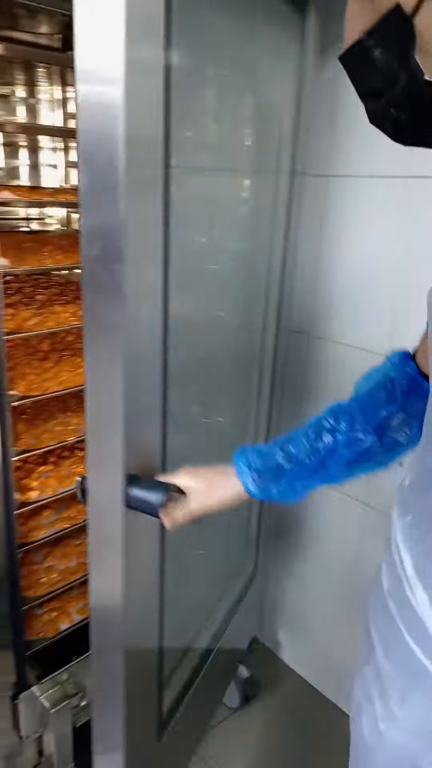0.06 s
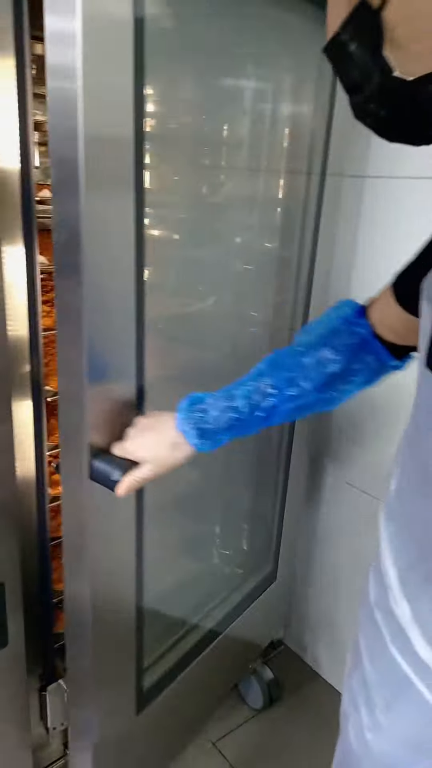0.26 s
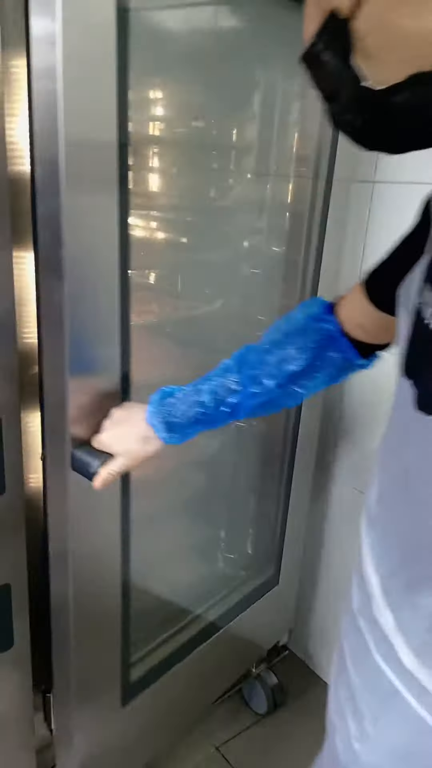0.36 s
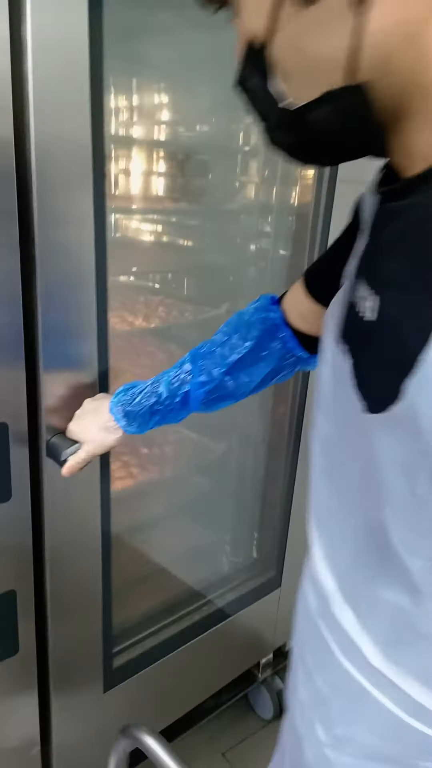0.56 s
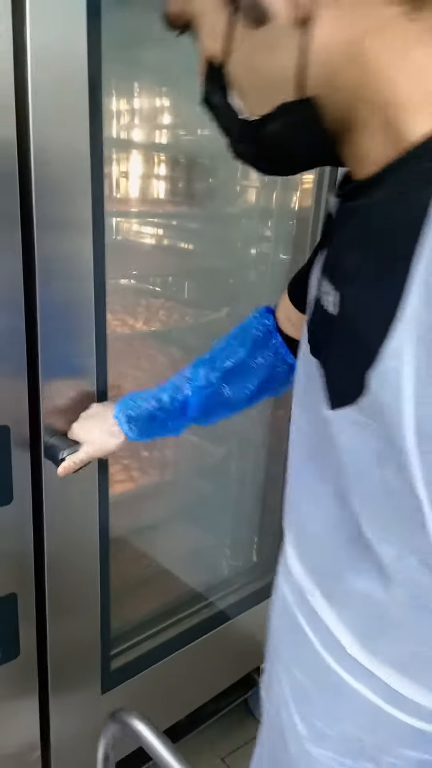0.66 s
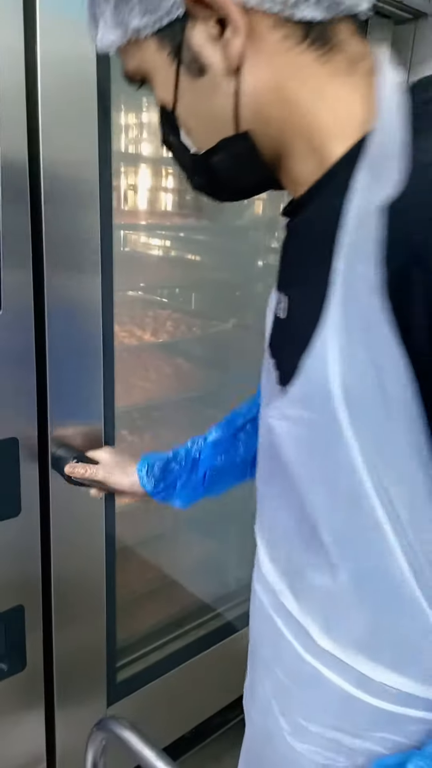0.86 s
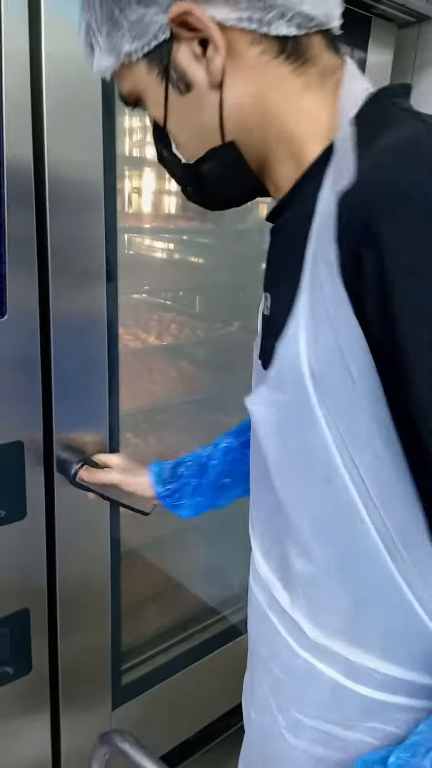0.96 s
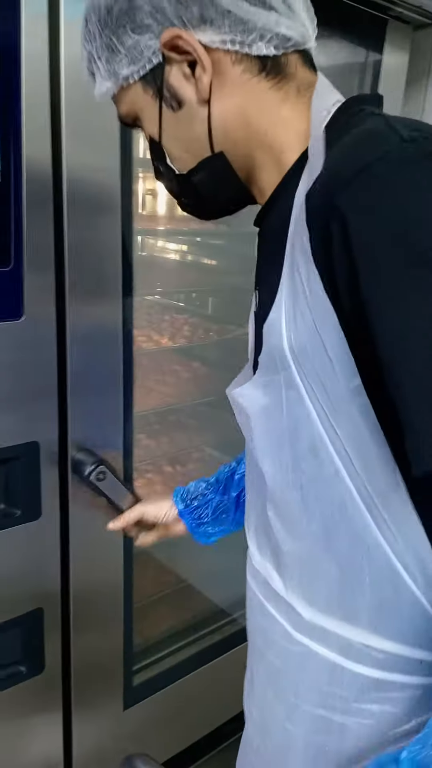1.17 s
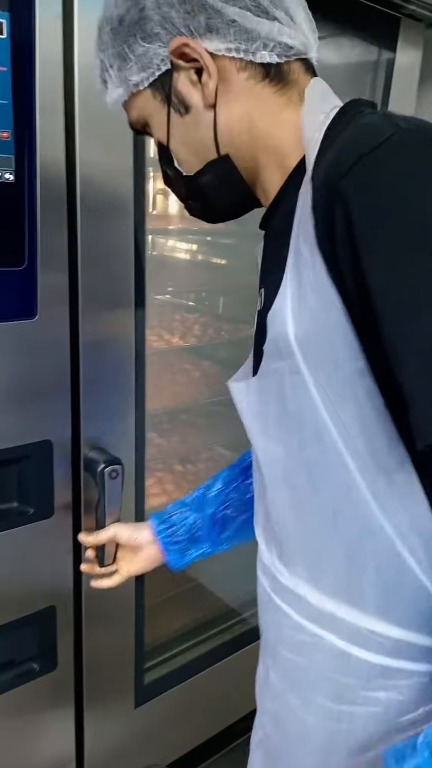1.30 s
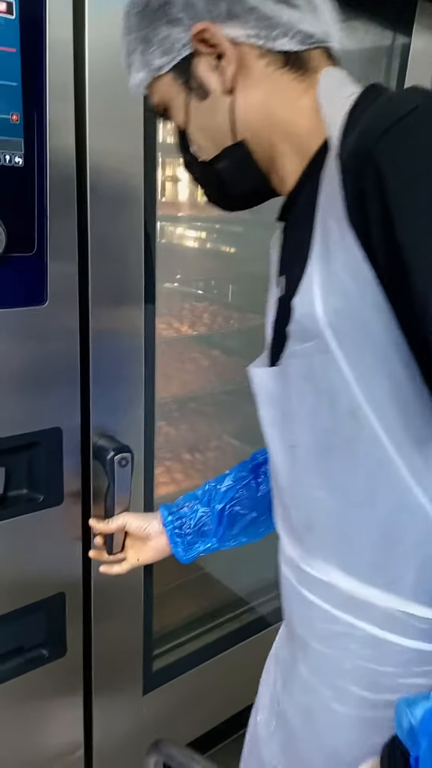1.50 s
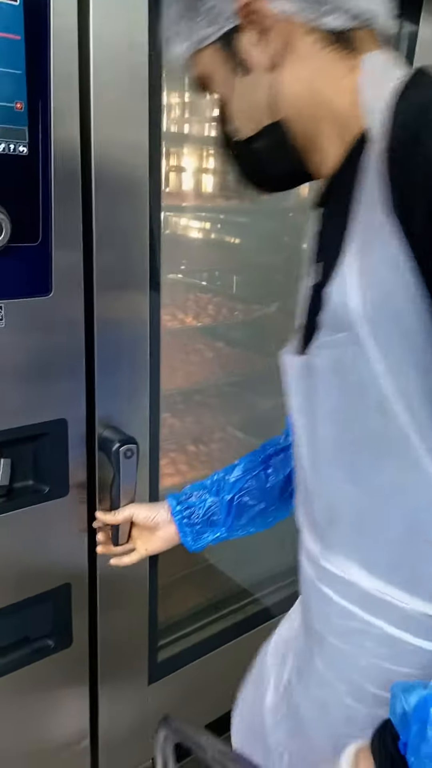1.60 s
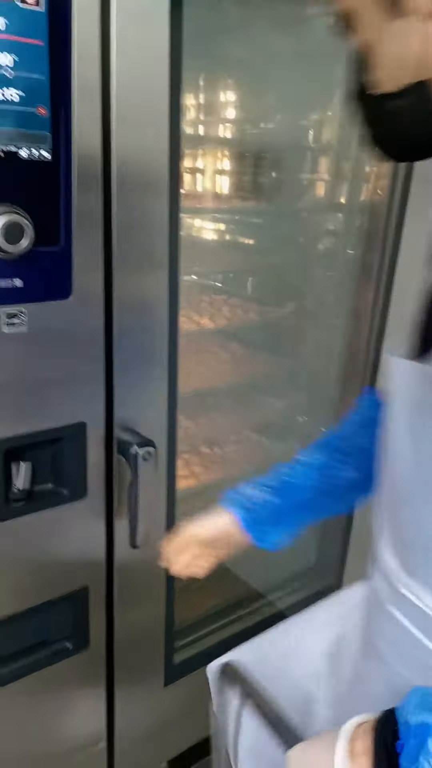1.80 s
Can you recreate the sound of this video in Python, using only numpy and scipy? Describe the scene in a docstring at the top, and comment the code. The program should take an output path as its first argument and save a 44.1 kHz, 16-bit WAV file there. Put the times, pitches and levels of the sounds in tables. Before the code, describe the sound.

A heavy steel oven door swings shut: a loose part clangs and rings, the latch scrapes, the rubber seal squeaks and the door thuds home. Then the handle snaps into place. Close stereo sound in a tiled kitchen with humming ventilation.

```python
"""A tiled kitchen, a stereo pair of microphones at the oven, the ventilation humming steadily behind.
The heavy steel door is swung shut: a loose steel part clangs and rings, the latch scrapes in,
the rubber seal squeaks and the door thuds home. Then the handle is turned down: it snaps into place
and the door clunks tight. The tiles add a short bright tail to latch and seal."""
import sys
import numpy as np
from scipy import signal
from scipy.fft import rfft, irfft
from scipy.io import wavfile

SR = 44100
rng = np.random.default_rng(int(sys.argv[2]) if len(sys.argv) > 2 else 0)


def dump(signal):
    """Clip the signal to [-1, 1] and save it as 16-bit WAV at the path in sys.argv[1]."""
    limited = np.clip(np.atleast_2d(signal).T, -1, 1)
    pcm = np.round(limited * 32767).astype(np.int16)
    wavfile.write(sys.argv[1], SR, pcm)


N = 81585
T = np.arange(N) / SR
FREQS = np.maximum(np.fft.rfftfreq(N, 1 / SR), 1)
ALIKE_BELOW_HZ = 780  # below this both microphones hear nearly the same


def undb(db):
    """Decibels to amplitude."""
    return 10 ** (np.asarray(db) / 20)


def unit(x):
    """Scale to rms 1."""
    return x / np.sqrt(np.mean(x ** 2))


def curve(points):
    """Gain at every frequency from (f/Hz, level/dB) points."""
    hz, db = np.array(points).T
    return undb(np.interp(np.log(FREQS), np.log(hz), db))


def below(hz):
    """Gain of a fourth-order low-pass."""
    return 1 / np.sqrt(1 + (FREQS / hz) ** 8)


def between(low_hz, high_hz):
    """Gain of a band-pass with a steep lower edge."""
    return below(high_hz) * (1 - below(low_hz) ** 2)


def crowded_modes(spacing_hz, peak_db):
    """Gain of a metal body with many close resonances: random peaks and valleys."""
    grid = np.arange(0, SR / 2, spacing_hz)
    heights = np.clip(rng.standard_normal(len(grid)), -2, 1.5)
    return undb(peak_db * np.interp(FREQS, grid, heights))


def fade(start, t60):
    """Envelope: full until start, then down 60 dB every t60 seconds."""
    return np.exp(-np.log(1000) * np.maximum(T - start, 0) / t60)


def strike(start, rise, t60):
    """Envelope: a quick rise, then an even fade."""
    return (1 - np.exp(-np.maximum(T - start, 0) / rise)) * fade(start, t60)


def swell(middle_s, spread_s):
    """Envelope: a smooth bell curve."""
    return np.exp(-.5 * ((T - middle_s) / spread_s) ** 2)


def noise(gain):
    """Stereo noise of a given colour at rms 1; the bass is alike at both microphones."""
    mid, side = rfft(rng.standard_normal((2, N)))
    alike = .95 / (1 + (FREQS / ALIKE_BELOW_HZ) ** 2)
    mid, side = mid * np.sqrt(1 + alike), side * np.sqrt(1 - alike)
    return unit(irfft(np.array([mid + side, mid - side]) * gain, N))


def ring(hz, start):
    """A sine at both microphones; their phases draw together in the bass."""
    apart = rng.choice([-1, 1]) * rng.uniform(.7, 1.3) * np.pi / 4 * min(hz / ALIKE_BELOW_HZ, 1)
    return np.sin(2 * np.pi * hz * (T - start) + np.array([[apart], [-apart]]))


def kitchen(x, wet_db):
    """Direct sound plus the short bright tail off the tiles."""
    tail = unit(noise(1) * strike(0, rise=.001, t60=.31)) / np.sqrt(N)
    return x + undb(wet_db) * signal.fftconvolve(np.broadcast_to(x, (2, N)), tail, axes=1)[:, :N]


# spectrum of the rushing air (f/Hz, relative level/dB)
AIR_COLOUR = [(15, -68), (25, -31.5), (92, -8.5), (134, -3.5), (263, -6), (293, -1), (354, -15),
              (489, -15.5), (531, -16), (695, -16.5), (962, -19.5), (1400, -21.5), (2160, -27.5),
              (3520, -30.5), (6210, -31), (9320, -48.5), (16000, -73.5)]
# tones of the fan (f/Hz, level/dB)
FAN_TONES = [(141, -52.5), (220, -52), (290, -51.5), (494, -62), (877, -55.5)]

def ventilation():
    """The room tone: rushing air with wavering fan tones."""
    air_db = -40 + .5 * noise(below(5.3))[0]  # the level flickers slightly
    out = undb(air_db) * noise(curve(AIR_COLOUR))
    for hz, db in FAN_TONES:
        tone = ring(hz, rng.random())
        waver = 1 + .61 * noise(below(13))[0]
        out += undb(db) * unit(tone * waver)
    return out


def rustle():
    """A faint rustle as the arm starts to swing the door."""
    return undb(-50.5) * swell(middle_s=.04, spread_s=.11) * noise(between(1680, 4200))


# soft booms of the moving door (middle t/s, spread/s, level/dB, centre f/Hz)
DOOR_BOOMS = [(0.542, 0.045, -33.5, 260), (0.33, 0.063, -34.5, 303), (1.083, 0.032, -36.5, 143),
              (.795, 0.0047, -36.5, 105), (0.879, 0.024, -30, 140)]

def door_rumble():
    """The big door booms softly while it is moved and pressed."""
    log_width = .3
    out = 0
    for middle, spread, db, hz in DOOR_BOOMS:
        band = 1 / (1 + (np.log(FREQS / hz) / log_width) ** 4)
        out += undb(db) * swell(middle, spread) * noise(band)
    return out


# squeaks of the rubber seal (t/s, length/s, f/Hz, level/dB)
SEAL_SQUEAKS = [(.721, .029, 712, -21), (.758, .018, 590, -24), (.829, .034, 495, -26)]

def seal():
    """The rubber seal rubs on the frame in brief, rough, falling squeaks."""
    sag, roughness = .04, .03  # fractions of the pitch
    out = 0
    for start, length, hz, db in SEAL_SQUEAKS:
        along = np.clip((T - start) / length, 0, 1)
        pitch = hz * (1 - sag * (along - .5) + roughness * noise(below(170))[0])
        arch = np.sqrt(np.abs(np.sin(np.pi * along)))
        out += undb(db) * arch * np.sin(2 * np.pi * np.cumsum(pitch) / SR)
    return kitchen(out, wet_db=-6)


# contacts in the latch (t/s, relative level/dB, low f/Hz, high f/Hz, decay time/s, rise/s)
LATCH_HITS = [(0.242, -30, 4500, 7900, 0.0034, 0.0012), (0.699, -29, 3060, 8360, 0.0094, 0.0054),
              (0.704, -28.5, 940, 6050, 0.025, 0.011), (0.754, -27.5, 800, 5750, .012, 0.0059),
              (.841, -26, 3630, 8160, 0.003, 0.00022), (0.845, -26, 1490, 5900, 0.005, 0.0012),
              (1.245, -43.5, 1200, 3500, .015, 0.0024), (1.368, -19, 2130, 8300, 0.0042, 0.00023),
              (1.397, -21.5, 930, 4860, 0.0027, 0.00062)]
# spectrum of the contacts (f/Hz, relative level/dB)
LATCH_COLOUR = [(500, 7.5), (1200, -1), (1800, 3), (2500, 3), (3400, -2.5), (4400, -2.5), (5700, -4),
                (6600, -5), (7400, -8), (9000, -12.5), (12000, -21.5)]
# modes of the latch (f/Hz, relative level/dB, t60/s)
LATCH_MODES = [(2040, -25, .25), (2460, -17, .4), (2640, -18, .3), (2821, -17, .23), (4156, -19, .14),
               (4600, -23, .25), (5510, -16, .26), (5640, -15, .25), (5950, -17, .34), (6430, -22, .22)]

def latch():
    """Each contact is a gritty burst of metal on metal that rings the latch; the room draws it out."""
    energy_s = .0073  # a burst holds the energy of this long at its level
    bursts, rings = 0, 0
    blows = np.zeros((len(LATCH_MODES), N))  # one track of impulses per mode
    mode_hz = np.array(LATCH_MODES)[:, 0]
    colour = curve(LATCH_COLOUR) * crowded_modes(spacing_hz=45, peak_db=3.5)
    for start, db, low_hz, high_hz, decay, rise in LATCH_HITS:
        grit = rng.standard_normal((2, N)) * np.exp(.5 * rng.standard_normal(N))
        scrape = grit * strike(start, rise, t60=decay * np.log(1000))
        band = between(low_hz, high_hz)
        burst = irfft(rfft(scrape) * colour * band, N)
        bursts += undb(db) * unit(burst) * np.sqrt(energy_s * SR / N)
        blows[:, int(start * SR)] += undb(db) * np.interp(mode_hz, FREQS, band)
    for blow, (hz, db, t60) in zip(blows, LATCH_MODES):
        mode = undb(db) * ring(hz, 0) * strike(0, .001, t60)
        rings += signal.fftconvolve(blow[None], mode, axes=1)[:, :N]
    return kitchen(bursts, wet_db=2) + undb(-5) * rings


# thuds of the door on its frame (t/s, relative level/dB, cutoff f/Hz, rise/s)
DOOR_THUDS = [(.761, -21, 1000, 0.009), (0.776, -26.5, 176, 0.0033), (.840, -16, 756, 0.018),
              (0.898, -21, 447, 0.0042), (.944, -30.5, 350, 0.0038), (1.400, -20, 900, 0.0045)]
# modes of the door (f/Hz, relative level/dB, t60/s)
DOOR_MODES = [(49, -32.5, 0.9), (119.4, -40, 0.13), (143.1, -7.5, 0.29), (218, -2, 0.085), (265.2, 1, 0.16),
              (288.7, -4.5, .25), (434.7, 0.5, 0.057), (558, -14, 0.42), (700, -10, .17),
              (783, -10.5, 0.29)]
# spectrum of its shaking panels (f/Hz, relative level/dB)
PANEL_COLOUR = [(30, -27), (70, -32), (130, 5), (270, 5), (380, -1), (560, 2.5), (900, 3), (1600, 7),
                (3000, -65)]

def door_thuds():
    """Thuds ring the door and shake its panels; a softer push stays lower."""
    out = 0
    for start, db, high_hz, rise in DOOR_THUDS:
        modes = 0
        for hz, mode_db, t60 in DOOR_MODES:
            drive = undb(mode_db) / np.hypot(1, (hz / high_hz) ** 2)
            modes += drive * ring(hz, start) * strike(start, rise, t60)
        panels = noise(curve(PANEL_COLOUR) * below(high_hz)) * strike(start, rise, t60=.31)
        out += undb(db) * (undb(.5) * modes + undb(-4.5) * panels)
    return out


# blows on the loose steel part (t/s, relative level/dB, low f/Hz, high f/Hz)
STEEL_BLOWS = [(0.238, -2, 900, 3800), (.2435, 5.5, 450, 4500), (.250, -10, 450, 9000),
               (0.278, -21, 600, 4000), (0.32, -11, 250, 9000)]
# spectrum of its dense wash of weaker modes (f/Hz, relative level/dB)
STEEL_WASH = [(250, -24), (550, -7), (950, -27), (1500, -4.5), (2200, -5), (3500, -8), (4500, -17),
              (6200, -9), (6700, 3.5), (7100, -10.5), (7700, -4), (10000, -43.5)]
# its clear modes (f/Hz, relative level/dB, t60/s)
STEEL_MODES = [(652.5, -31, .5), (721.5, -34, 1.0), (796, -33, .6), (1173, -28, .85), (1238, -31, .3),
               (1290, -29, .3), (1420, -21, 1.65), (1422, -32, 1.5), (1491.5, -27, 1.0), (1574, -33, .4),
               (1672, -28, .35), (2085, -30, .56), (2114, -23, .33), (2702, -36, .36), (3150, -34, .6),
               (3360, -28, .3), (3419, -27, .35), (3606, -28, .33), (3630, -34, .22), (4139, -37, .25),
               (6681, -30, .3), (7452, -35, .31)]

def steel_clang():
    """A chatter of blows raises a wash of modes and clear, wavering tones that the closing door damps."""
    wash_db, tones_db = -19, -.5
    build_s, hold_s = .0065, .1  # the chatter keeps the tones up before they fade
    waver_depth, waver_hz = .55, 16.4
    body = curve(STEEL_WASH) * crowded_modes(spacing_hz=18, peak_db=6)
    out = 0
    for start, db, low_hz, high_hz in STEEL_BLOWS:
        wash = noise(body * between(low_hz, high_hz))
        out += undb(wash_db + db) * wash * strike(start, rise=.00023, t60=.35)
    first_blow = STEEL_BLOWS[0][0]
    build = strike(first_blow, build_s, t60=np.inf)
    door_damping = fade(start=.683, t60=1)
    for hz, db, t60 in STEEL_MODES:
        drift = unit(irfft(rfft(rng.standard_normal((2, N))) * below(waver_hz), N))
        envelope = build * fade(first_blow + hold_s, t60) * door_damping
        out += undb(tones_db + db) * ring(hz, first_blow) * (1 + waver_depth * drift) * envelope
    return out


def scene():
    """The door is swung, closed and latched over the kitchen hum."""
    return steel_clang() + latch() + door_thuds() + door_rumble() + seal() + ventilation() + rustle()


# response of the microphones (f/Hz, level/dB)
MIC_RESPONSE = [(1000, -1), (7400, 0), (8600, -11), (10000, -18.5), (13000, -11), (15200, 4)]
# left microphone minus right (f/Hz, level/dB)
MIC_BALANCE = [(60, -1.6), (200, -2.3), (700, -1.5), (1500, -2.3), (3000, -3), (6000, -6.4), (8500, -1)]

def record(dry):
    """The stereo pair: the right side hears more; the treble dips around 10 kHz and its top is cut off."""
    top_hz = 16400
    lean = np.sqrt(curve(MIC_BALANCE))
    heard = irfft(rfft(dry) * curve(MIC_RESPONSE) * np.array([lean, 1 / lean]), N)
    return signal.sosfilt(signal.ellip(8, .2, 70, top_hz, fs=SR, output="sos"), heard)


dry = scene()
out = record(dry)
dump(out)
```